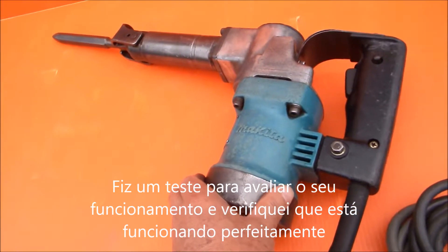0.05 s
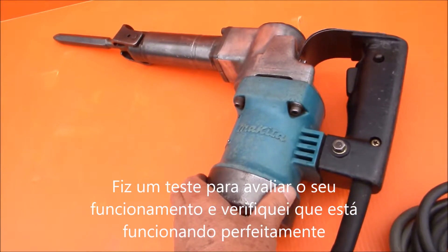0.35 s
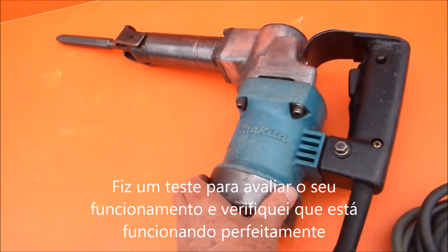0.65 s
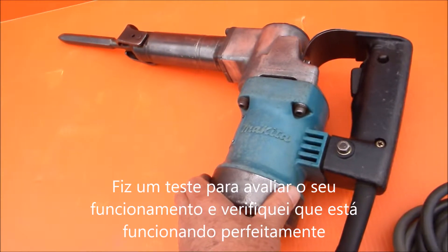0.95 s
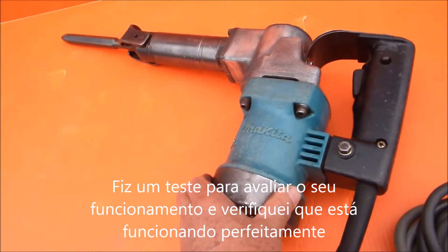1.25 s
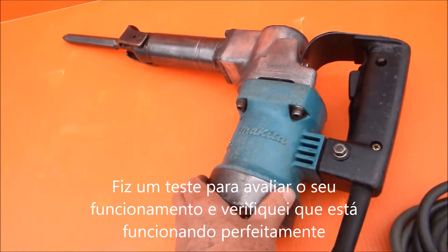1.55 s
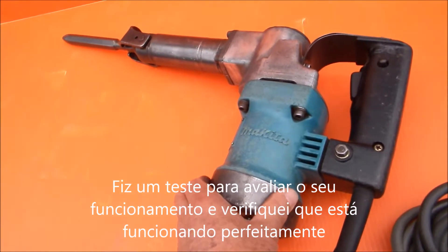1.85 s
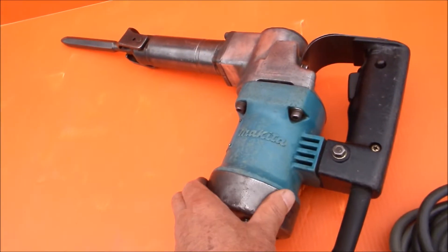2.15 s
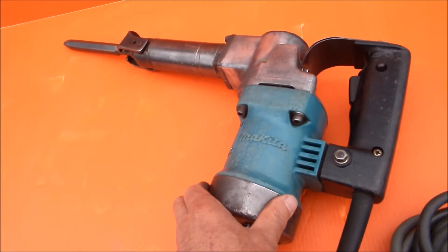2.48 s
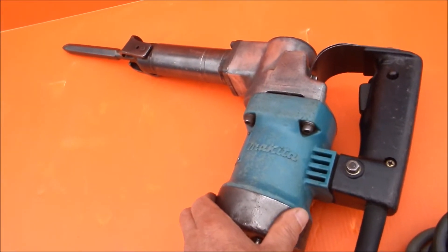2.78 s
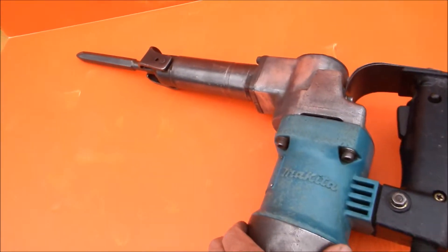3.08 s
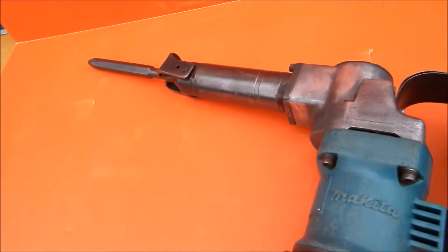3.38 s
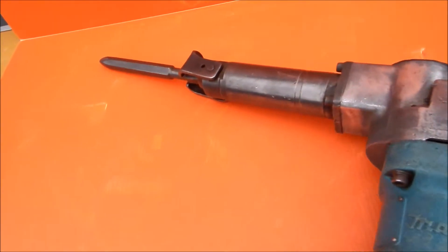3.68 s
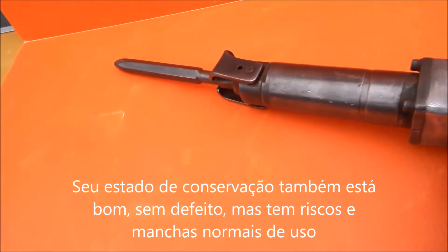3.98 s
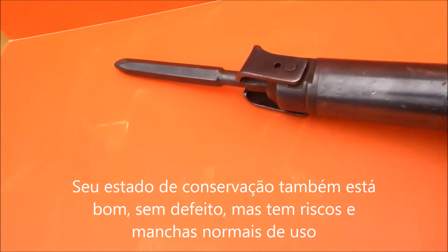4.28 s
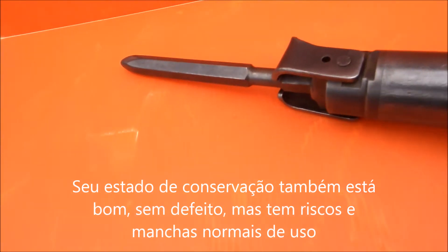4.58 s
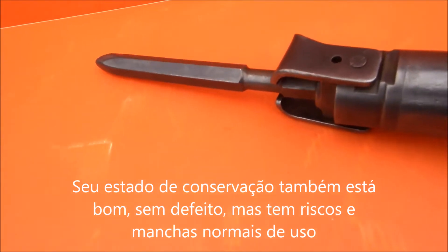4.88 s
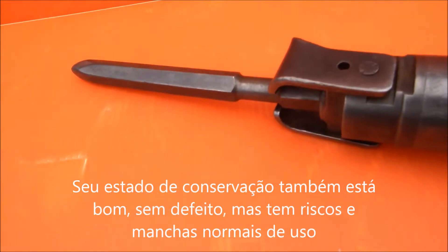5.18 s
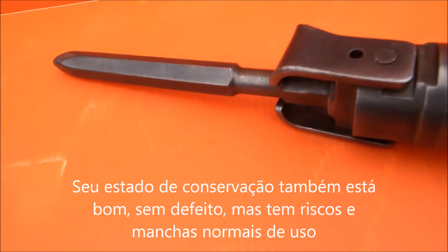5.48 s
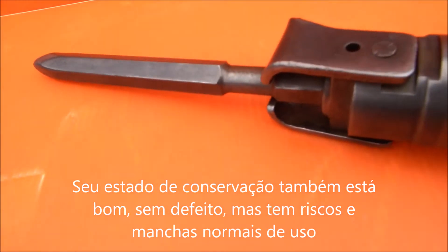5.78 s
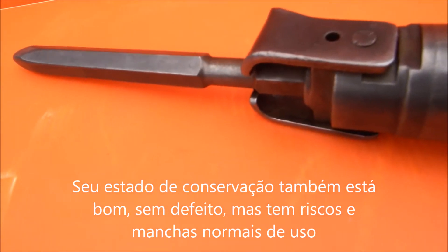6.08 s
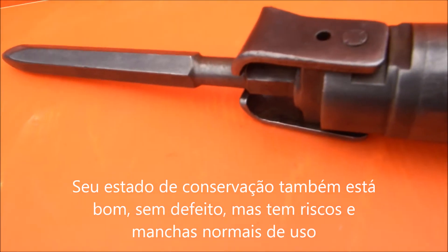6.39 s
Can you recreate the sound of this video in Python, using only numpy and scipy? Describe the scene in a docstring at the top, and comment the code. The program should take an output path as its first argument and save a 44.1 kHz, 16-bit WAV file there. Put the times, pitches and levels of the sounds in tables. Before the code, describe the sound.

An electric demolition hammer is already running unloaded on a table, heard close up, and keeps a constant speed for the whole six and a half seconds or so. It makes a rattling, rapidly throbbing roar with motor and gear hum, fan hiss and a thin high whine. The metal housing rings and the table top drones faintly underneath. Throughout, the loose chisel chafes in its holder, giving short, irregular, very high squeals. Small metallic knocks come at about 0.9, 2.6, 3.8 and 4.6 seconds. From around 3 to 5 seconds the microphone moves from the motor along the barrel to the chisel: the roar and hum ease slightly and the squeals become more prominent, sharpest between 4.6 and 5.2 seconds and again near 5.9. The whine grows stronger toward the end, with the tool still running.

```python
"""A rattling roar with hum and hiss: an electric demolition hammer runs unloaded on a table.
Gear case, barrel and fan noise throb with the piston; motor and gears hum, the armature slots whine.
The loose chisel chafes in its holder and sings in short, high bursts.
The housing rings, loose parts knock and the table top drones faintly.
The microphone starts beside the motor and moves toward the chisel."""
import sys
import numpy as np
from scipy import signal
from scipy.fft import rfft, irfft, next_fast_len
from scipy.io import wavfile

SR = 44100
rng = np.random.default_rng(int(sys.argv[2]) if len(sys.argv) > 2 else 0)


def bounce(signal):
    """Save signal as a 16-bit WAV file at the path given by the first command-line argument."""
    frames = np.transpose(np.atleast_2d(signal))
    limited = np.clip(frames, -1, 1)
    pcm = np.round(limited * 32767).astype(np.int16)
    wavfile.write(sys.argv[1], SR, pcm)


N = 292824

# cast housing modes: (frequency [Hz], width [Hz], rms at motor [dB], rms at chisel [dB])
HOUSING_MODES = [(693, 31, -34.5, -46), (945, 15, -36, -47), (1350, 54, -39, -37.5), (1418, 57, -42, -36.5),
                 (2276, 32, -42.5, -43)]
SIDES = np.array([[1], [-1]])  # left, right


def drive_noise(strokes, place, surge_db):
    """Gear case, barrel and fan: noise that throbs with the piston and surges as the tool shakes."""
    # spectral shapes: (frequency [Hz], at motor [dB], over barrel [dB], at chisel [dB])
    case_shape = [(15, -80, -82, -97), (50, -75, -76, -96), (113, -72, -69, -71), (227, -69, -75, -68),
                  (420, -63, -68.5, -66.5), (544, -57.5, -56, -60), (683, -46.5, -48, -53),
                  (773, -50, -50.5, -54), (1123, -52, -56.5, -53.5), (1262, -54.5, -53, -68),
                  (1326, -49, -45, -52), (1580, -49, -63.5, -54), (1834, -53, -56, -57),
                  (2100, -59.5, -60, -61), (2750, -75, -73, -97)]
    barrel_shape = [(1630, -83, -75, -68), (2320, -61, -56, -57), (2790, -51.5, -52.5, -54),
                    (3040, -61, -50.5, -58.5), (3184, -53, -56, -52), (3400, -49, -50.5, -51.5),
                    (3480, -52.5, -49.5, -59), (3630, -45, -52, -48), (3620, -59, -47.5, -53),
                    (4220, -50.5, -52, -55), (4030, -60, -57, -56), (4870, -58, -58.5, -58),
                    (5720, -81, -80, -68)]
    fan_shape = [(4300, -97, -80, -85), (5240, -64, -60.5, -66), (5560, -62.5, -65.5, -65),
                 (6200, -65.5, -57, -61), (7000, -60.5, -62.5, -60.5), (7760, -63, -59, -63.5),
                 (8800, -58.5, -60, -60.5), (9240, -63, -58, -67), (9620, -58.5, -59, -60.5),
                 (11130, -60, -61.5, -64.5), (12700, -66, -64.5, -66.5), (13800, -67, -67, -71),
                 (15100, -65.5, -68, -65), (15800, -75, -78, -84)]
    # rattle over one piston stroke: (phase [cycles], relative level [dB])
    stroke_shape = [(0, 1.5), (.1, 2.5), (.2, 0.7), (.33, 2.5), (.55, 0), (.8, -1.7), (.86, 3.5), (.92, 2),
                    (1, 4)]
    throb_db = np.interp(strokes % 1, *np.transpose(stroke_shape))
    shake = drift(46)
    # play in the gear train
    chatter = .5 * (np.sin(2 * np.pi * 7 * strokes) + np.sin(2 * np.pi * 9 * strokes))
    case = rattling(0.88 * throb_db + 0.4 * shake, grain_db=1.3)
    barrel = rattling(1.2 * throb_db + 0.59 * shake + 0.61 * chatter, grain_db=-0.2)
    fan = rattling(0.9 * throb_db + 0.65 * shake + 0.61 * chatter, grain_db=0.6)
    noise = radiated(*case, case_shape, place, band_hz=(450, 2300), levels_db=(-21, -20, -26))
    noise += radiated(*barrel, barrel_shape, place, band_hz=(2650, 5000), levels_db=(-22.6, -23.5, -26.5))
    noise += radiated(*fan, fan_shape, place, band_hz=(6800, 9600), levels_db=(-26.2, -26, -29.5))
    flutter_db = 0.81 * drift(16)
    return noise * from_db(surge_db + flutter_db)


def rattling(level_db, grain_db):
    """Countless tiny contacts of uneven size, and their smoother reflections."""
    envelope = rms_one(from_db(level_db))
    contacts = rms_one(rng.standard_normal(N) * from_db(grain_db * drift(900)))
    return envelope * contacts, envelope * rng.standard_normal(N)


def rattle_surge_db():
    """The rattle surges and slackens in rounded plateaus."""
    # (centre [s], length [s], level change [dB])
    surges = [(0.162, .06, -1.7), (0.212, 0.026, 2.5), (0.373, .06, -2.5), (0.495, 0.095, 1.5),
              (0.733, 0.094, 2.5), (0.914, .04, 3), (0.968, 0.057, -2), (1.136, .08, -0.8),
              (1.462, .08, 1.2), (1.69, 0.028, 2.3), (1.862, 0.073, 2.6), (1.99, 0.062, -2.2),
              (2.08, .04, 2.5), (2.443, 0.36, -1.1), (2.707, 0.3, 1.5), (3.103, 0.37, -2.5), (3.3, .04, 2),
              (3.702, 0.19, -2), (3.855, 0.06, 1.4), (4.58, .04, 2), (5.137, .15, 2.2), (5.73, 0.073, 3),
              (5.82, 0.09, -2.5), (6.066, .06, 2.5), (6.157, 0.067, -3.5), (6.35, 0.22, 0.8),
              (6.507, 0.067, -1)]
    t = np.arange(N) / SR
    return sum(db * np.exp(-np.minimum((2 * (t - centre_s) / length_s) ** 4, 20))
               for centre_s, length_s, db in surges)


def chisel(place, surge_db):
    """Friction in the holder feeds the steel's bending modes; they swell at each catch and soon die."""
    # bending modes: (frequency [Hz], width [Hz], wobble scale [Hz])
    modes = [(6492, 80, 15), (10076, 90, 16), (14870, 75, 9)]
    # full squeal, one row per mode: (at motor [dB], over barrel [dB], at chisel [dB])
    squeal_db = [(-28.5, -25, -24), (-27.5, -24, -16), (-29, -41, -34)]
    # hard catches: (start [s], length [s], strength re full squeal [dB], tilt [dB/mode])
    hard_catches = [(0.04, .014, 3, 2), (.6, .014, 2.5, -4), (.777, .036, 0, 3), (1.255, .029, -1, 6),
                    (1.955, .021, -3, 9), (2.222, .023, 2.5, 1), (3.3, .03, 1, 3), (3.377, .013, -1, -8),
                    (4.056, 0.023, -1.5, 0), (4.22, 0.013, -4, -3), (4.431, 0.039, -4, 0),
                    (4.58, .013, 3, 5), (4.723, 0.028, 5.5, 7), (4.82, .014, 4.5, 7),
                    (4.886, 0.016, 3.5, 7), (5.095, 0.013, 3, 8), (5.148, 0.035, 0.5, 7),
                    (5.298, 0.019, -2, 1), (5.39, .016, -1, 3), (5.698, 0.029, -1.5, -5),
                    (5.88, .036, 2.5, 1), (5.955, .072, -4, 2), (6.034, 0.03, 0, -2), (6.38, 0.016, -1, -4)]
    out = np.zeros((2, N))
    chafe_db = -14 + 4.1 * drift(22) + surge_db
    catches = light_catches() + hard_catches
    for k, ((hz, width_hz, wobble_hz), levels_db) in enumerate(zip(modes, squeal_db)):
        feed_db = chafe_db + 4.5 * drift(28)
        for start_s, length_s, strength_db, tilt_db in catches:
            feed_db[int(start_s * SR):int((start_s + length_s) * SR)] = strength_db + (k - 1) * tilt_db
        feed = from_db(feed_db + at_place(levels_db, place))
        pole = np.exp(-np.pi * width_hz / SR)
        swing = signal.lfilter([1 - pole], [1, -pole], feed) * from_db(1.9 * drift(90))
        # the shifting contact pulls the pitch about
        pitch_hz = hz + wobble_hz * (drift(30.4) + 1.55 * drift(254))
        phase = 2 * np.pi * np.cumsum(pitch_hz) / SR
        reflected = from_db(-20) * np.sin(phase + 1.5 * drift(5))
        out += np.sqrt(2) * swing * (np.sin(phase) + SIDES * reflected)
    return out


def light_catches(count=120, rate_per_s=12, length_s=0.021, mean_db=-5.5, spread_db=3.5):
    """Small slips in the holder at uneven intervals; same columns as the hard catches."""
    gaps, stretch = rng.uniform(.5, 1.5, (2, count))
    offset_db, tilt_db = spread_db * rng.standard_normal((2, count))
    return list(zip(np.cumsum(gaps) / rate_per_s, length_s * stretch, mean_db + offset_db, tilt_db))


def shaft_hum(turns, strokes, place):
    """Harmonics of the armature and the crank."""
    # (multiple of shaft rate, rms at motor [dB], rms at chisel [dB])
    armature_orders = [(1, -45, -59), (3, -45, -65), (4, -40, -56), (5, -38.5, -45), (7, -40.5, -42.5),
                       (11, -42.5, -57), (13, -58, -50), (24, -52, -52)]
    crank_orders = [(1, -54, -69), (3, -55.5, -54), (5, -55, -56), (6, -46.5, -49.5), (7, -54, -55.5),
                    (8, -48.5, -63), (10, -43, -54.5), (11, -42.5, -45), (12, -63, -59), (14, -44, -53),
                    (17, -39.5, -53), (22, -38.5, -48), (24, -36, -49), (25, -37.5, -56), (26, -40, -36.5),
                    (70, -42, -52)]
    armature = sum(tone(order * turns, at_place(levels_db, place), waver_db=3.5)
                   for order, *levels_db in armature_orders)
    crank = sum(tone(order * strokes, at_place(levels_db, place), waver_db=2.0)
                for order, *levels_db in crank_orders)
    return armature + crank


def slot_whine(turns, strokes, place, slots=12, sideband_hz=100):
    """Armature slots whine, roughened by the drag of each stroke; a second tone lies just above."""
    # slot tone: (time [s], rms [dB])
    whine_level = [(0, -39), (2.2, -37), (3.15, -42), (4.25, -34), (4.85, -37.5), (5.9, -31.5),
                   (6.64, -27.5)]
    drag_cycles = .1 * np.sin(2 * np.pi * strokes) + .035 * drift(40)
    slot_cycles = slots * turns + drag_cycles
    whine = tone(slot_cycles, in_time(whine_level), waver_db=1.8)
    sideband_cycles = slot_cycles + sideband_hz * np.arange(N) / SR
    return whine + tone(sideband_cycles, at_place((-37, -48, -56), place), waver_db=2.5)


def housing(place):
    """Fits of rattling keep the casting's modes ringing."""
    direct, reflected = rng.standard_normal((2, N))
    contacts = (direct + from_db(-11.5) * SIDES * reflected) * from_db(4.1 * drift(12.3))
    contacts = high_passed(contacts, 650)
    return sum(rms_one(ring(contacts, hz, width_hz)) * from_db(at_place(levels_db, place))
               for hz, width_hz, *levels_db in HOUSING_MODES)


def knocks():
    """Loose parts strike: a hard tick, a few milliseconds of clatter, then the housing rings."""
    # (time [s], tick gain [dB], ring gain [dB])
    strikes = [(.9387, -7, -26), (.9755, -15, -30), (2.621, -15, -22), (3.814, -18, -19), (4.603, -17, -28)]
    ticks, blows = np.zeros((2, N))
    t = np.arange(SR // 50) / SR
    for time_s, tick_db, ring_db in strikes:
        start = int(time_s * SR)
        clatter = .3 * rng.standard_normal(len(t)) * np.exp(-t / .003)
        ticks[start:start + len(t)] += from_db(tick_db) * (np.exp(-t / .00008) + clatter)
        blows[start] = from_db(ring_db)
    ticks = signal.sosfilt(signal.butter(2, [700, 11000], "band", fs=SR, output="sos"), ticks + 1e-18)
    ringing = sum(ring(blows, hz, width_hz) for hz, width_hz, *_ in HOUSING_MODES)
    return ticks + high_passed(ringing, 590)


def table_top(strokes, nudges_per_s=45):
    """The table drones at twice the stroke rate; the tool nudges it, harder when lying firmly."""
    # drone: (time [s], rms [dB])
    drone_level = [(0.0, -49.5), (0.81, -48), (0.94, -54), (1.44, -46), (1.57, -58), (1.63, -43),
                   (2.22, -57), (2.25, -45), (3.16, -51), (4.9, -43.5), (5.82, -52), (6.64, -49.5)]
    drone_db = in_time(drone_level)
    drone = tone(2 * strokes, drone_db, waver_db=2.2)
    near, far = (rng.random((2, N)) < nudges_per_s / SR) * rng.standard_normal((2, N))
    nudges = near + from_db(-16) * SIDES * far
    bumps = rms_one(high_passed(ring(nudges, hz=135, width_hz=55), 140))
    return drone + bumps * from_db(-50 + drone_db - drone_db.mean())


def radiated(contacts, reflections, shape, place, band_hz, levels_db):
    """Colour noise for three microphone places and crossfade; levels_db applies within band_hz."""
    # stereo image: (frequency [Hz], reflections at motor [dB], at chisel [dB],
    # left minus right at motor [dB], at chisel [dB], left lead at chisel [rad])
    image = [(200, -47, -20, -0.7, 2, 0.27), (1330, -23, -19, 3.5, 0, 0.12), (1950, -26, -7, 0.3, -2.5, .1),
             (2400, -30, -11, -0.2, -1.5, .1), (3560, -16, -7, 2.5, -4, 0.24),
             (4400, -21, -8, 0.5, -1, .26), (5800, -23, -10, -0.5, -1.4, 0.59),
             (8360, -11, -3, -0.5, -4, 0.95), (11000, -11, -7, -0.5, -9.5, .08),
             (12700, -18, -1, -1.5, 1, .08), (15000, -47, -7, 2, -9, .1)]
    size = next_fast_len(N)
    hz = np.arange(size // 2 + 1) * SR / size + 1
    in_band = (hz > band_hz[0]) & (hz < band_hz[1])
    direct, diffuse = rfft(contacts, size), rfft(reflections, size)
    motor_side_db, chisel_side_db, motor_pan_db, chisel_pan_db, lead_rad = at_hz(image, hz)
    out = 0
    for spot, shape_db in zip((0, .5, 1), at_hz(shape, hz)):
        gain = from_db(shape_db) * (hz > shape[0][0]) * (hz < shape[-1][0])
        gain /= np.sqrt(np.mean(gain ** 2 * in_band))
        side = from_db(motor_side_db + spot * (chisel_side_db - motor_side_db))
        pan_db = motor_pan_db + spot * (chisel_pan_db - motor_pan_db)
        spectrum = panned(gain * (direct + SIDES * side * diffuse), pan_db)
        spectrum *= np.exp(.5j * SIDES * spot * lead_rad)
        share = np.clip(1 - 2 * np.abs(place - spot), 0, 1)
        out += share * irfft(spectrum, size)[:, :N]
    return out * from_db(at_place(levels_db, place))


def tone(cycles, rms_db, waver_db):
    """Sine that wavers in strength."""
    amplitude = np.sqrt(2) * from_db(rms_db + waver_db * drift(7.8))
    return amplitude * np.sin(2 * np.pi * (cycles + rng.random()))


def ring(force, hz, width_hz):
    """One mode: a unit click starts a decaying sine of height 1."""
    r, w = np.exp(-np.pi * width_hz / SR), 2 * np.pi * hz / SR
    return signal.lfilter([0, np.sin(w)], [1, -2 * r * np.cos(w), r * r], force + 1e-18)


def high_passed(x, hz):
    """Small bodies radiate little bass."""
    return signal.sosfilt(signal.butter(2, hz, "high", fs=SR, output="sos"), x)


def drift(corner_hz):
    """Smooth random curve, unit rms."""
    hop, settle = 40, 2000
    r = np.exp(-2 * np.pi * corner_hz * hop / SR)
    noise = rng.standard_normal(N // hop + settle + 2)
    slow = signal.lfilter([1], [1, -2 * r, r * r], noise)[settle:]
    return np.interp(np.arange(N) / hop, np.arange(len(slow)), rms_one(slow))


def at_place(levels_db, place):
    """Glide through levels spaced evenly from motor (0) to chisel (1)."""
    return np.interp(place, np.linspace(0, 1, len(levels_db)), levels_db)


def at_hz(rows, hz):
    """Interpolate each column over log frequency; only the frequency column is sorted."""
    points_hz, *columns = np.transpose(rows)
    return [np.interp(np.log(hz), np.log(np.sort(points_hz)), column) for column in columns]


def in_time(rows):
    """Join (time [s], value) points linearly."""
    return np.interp(np.arange(N) / SR, *np.transpose(rows))


def panned(x, pan_db):
    """Stereo, left minus right = pan_db."""
    return x * from_db(SIDES * pan_db / 2)


def from_db(db):
    return np.exp(np.asarray(db) * (np.log(10) / 20))


def rms_one(x):
    return x / np.sqrt(np.mean(x ** 2) + 1e-20)


def scene():
    """The unloaded armature holds its speed and turns the crank through one gear pair."""
    # microphone path: (time [s], place [0 at motor, 0.5 over barrel, 1 at chisel])
    microphone_path = [(0, 0.12), (2.8, 0.056), (3.3, 0.21), (3.9, 0.52), (4.5, 0.81), (5.2, 0.98),
                       (6.64, 0.97)]
    armature_hz, wander_hz = 323.9, .33
    pinion_teeth, wheel_teeth = 7, 41
    turns = np.cumsum(armature_hz + wander_hz * drift(2.05)) / SR
    backlash_cycles = 0.0049 * drift(4.7)
    strokes = turns * pinion_teeth / wheel_teeth + backlash_cycles
    place, surge_db = in_time(microphone_path), rattle_surge_db()
    hum = shaft_hum(turns, strokes, place)
    drone = table_top(strokes)
    whine = panned(slot_whine(turns, strokes, place), pan_db=-5.5)
    body = panned(hum + drone + housing(place), pan_db=-0.8 - place)
    squeal = panned(chisel(place, surge_db), pan_db=0.7)
    return drive_noise(strokes, place, surge_db) + squeal + body + whine + knocks()


def record(dry):
    """Narrow notch in the upper midrange and a steep top cut."""
    notch_hz, cutoff_hz = 2508, 15700
    notched = signal.lfilter(*signal.iirnotch(notch_hz, Q=notch_hz / 270, fs=SR), dry)
    return signal.sosfilt(signal.ellip(12, .1, 90, cutoff_hz, fs=SR, output="sos"), notched)


dry = scene()
out = record(dry)
bounce(out)
```